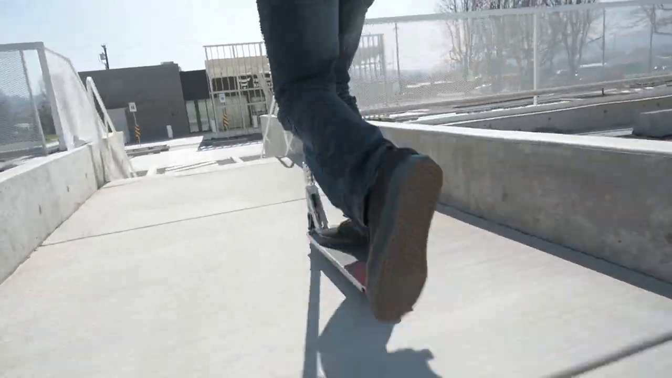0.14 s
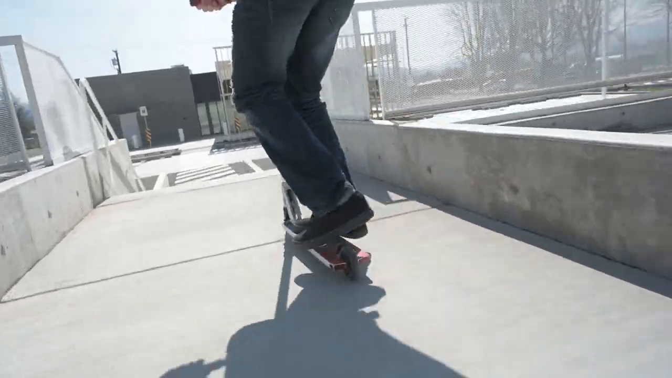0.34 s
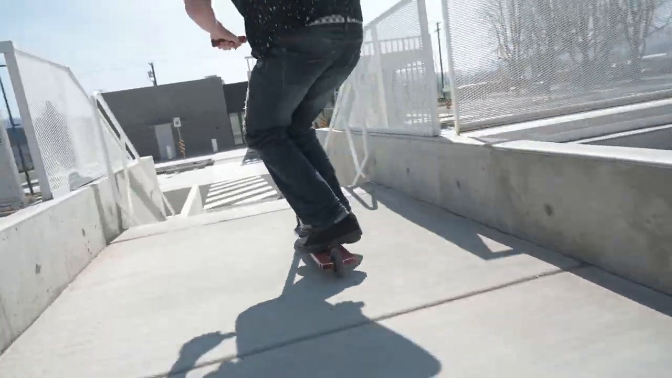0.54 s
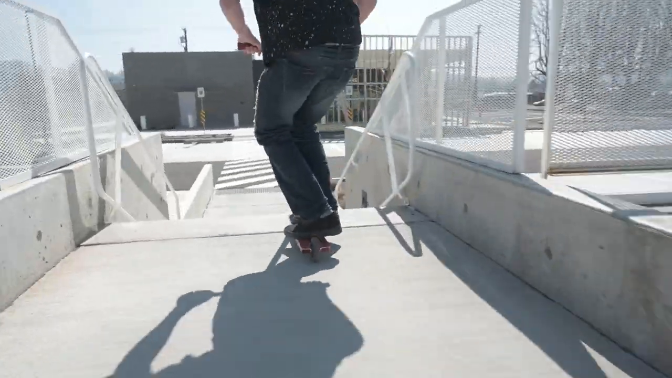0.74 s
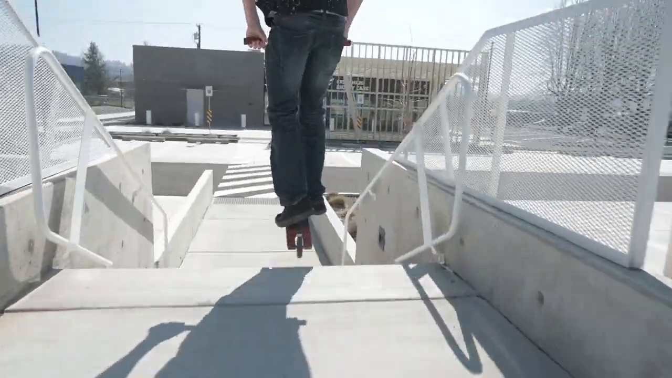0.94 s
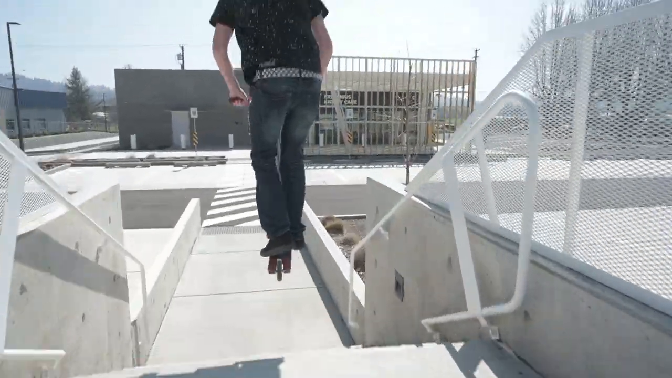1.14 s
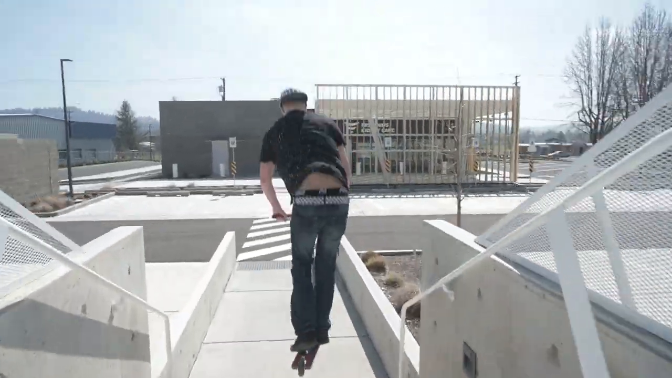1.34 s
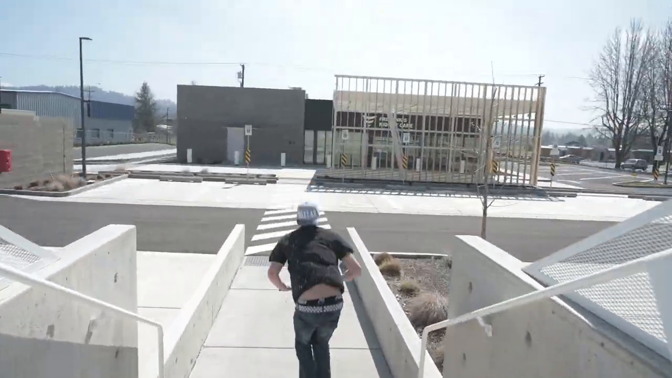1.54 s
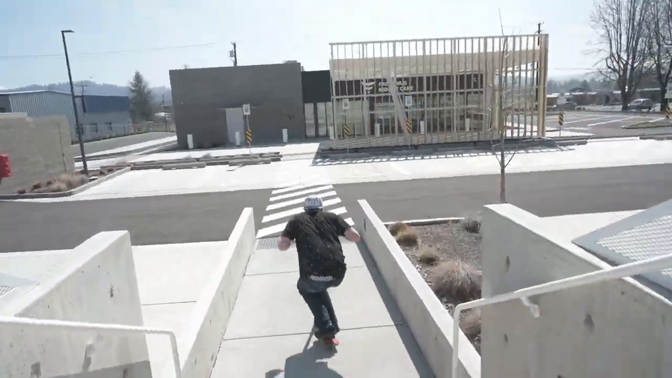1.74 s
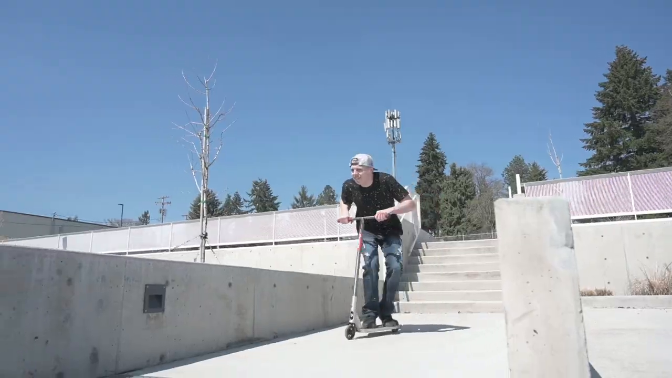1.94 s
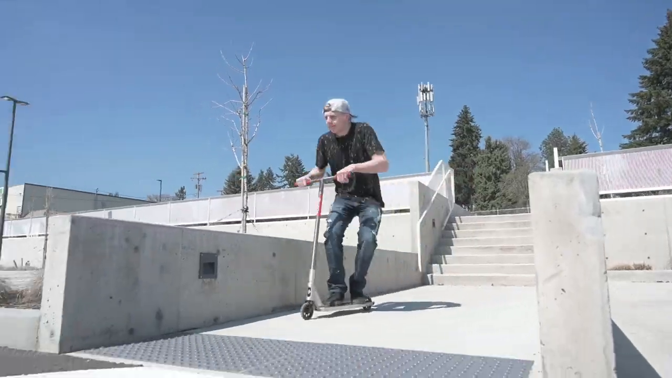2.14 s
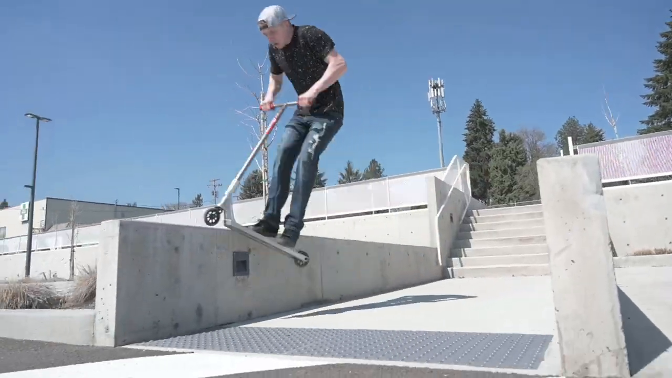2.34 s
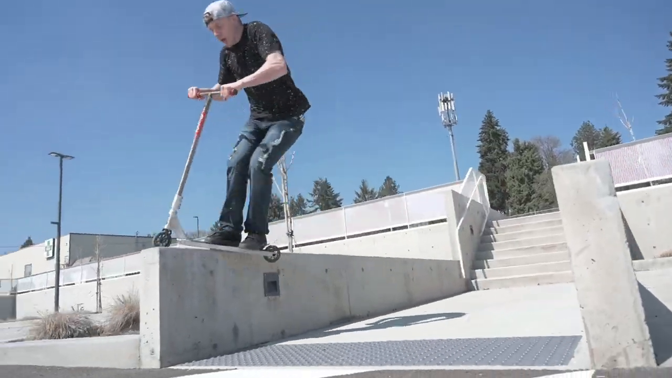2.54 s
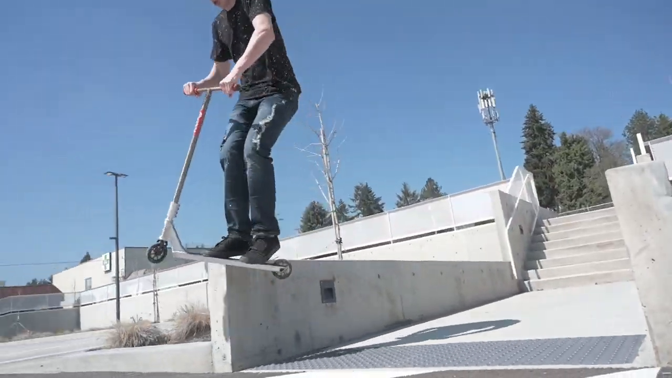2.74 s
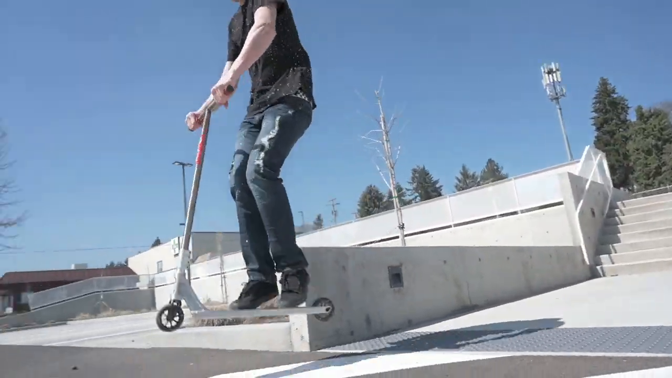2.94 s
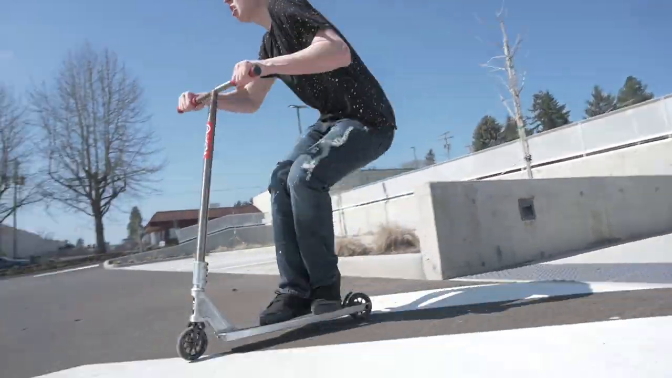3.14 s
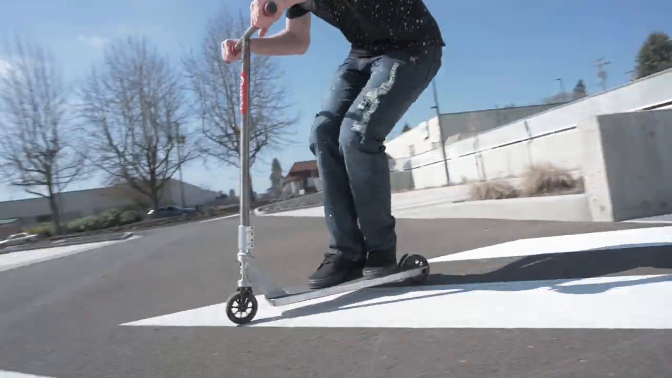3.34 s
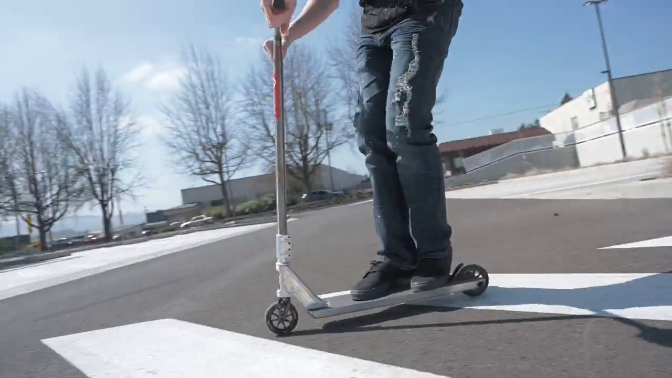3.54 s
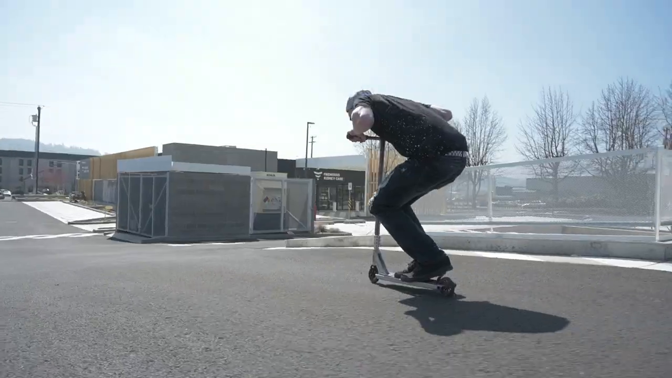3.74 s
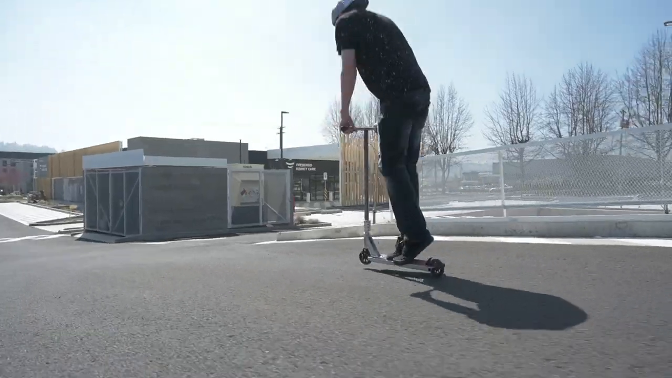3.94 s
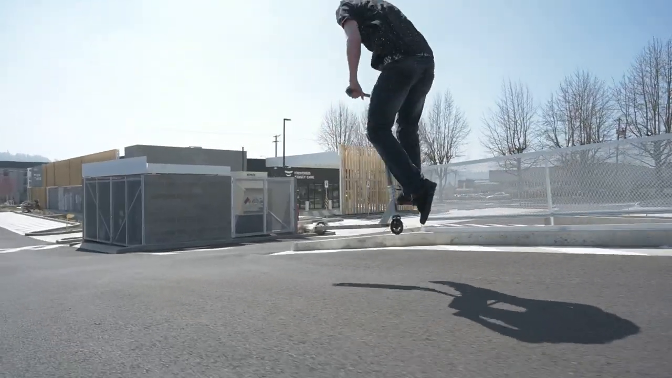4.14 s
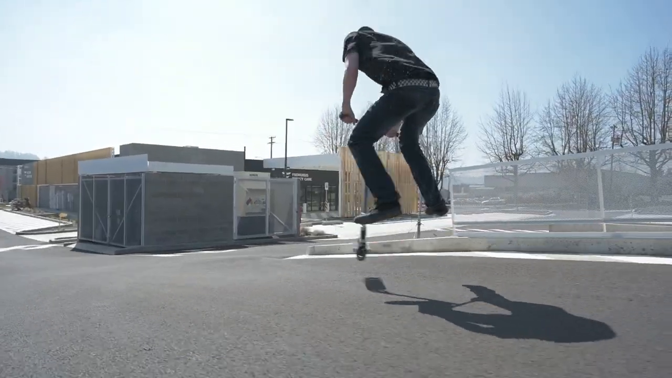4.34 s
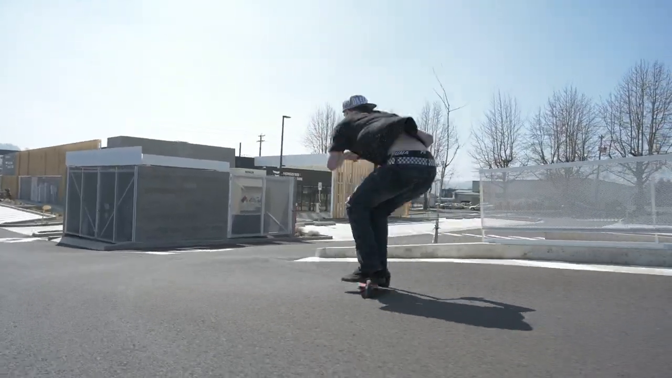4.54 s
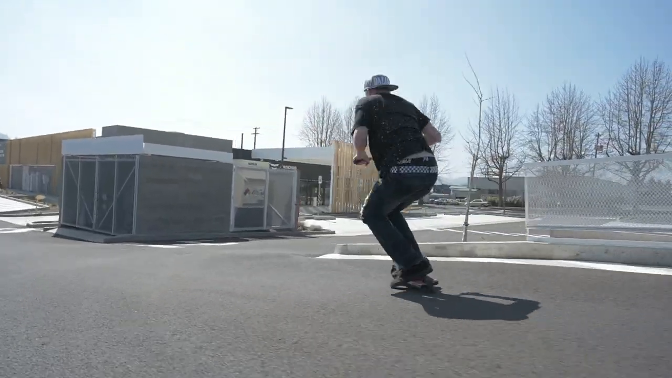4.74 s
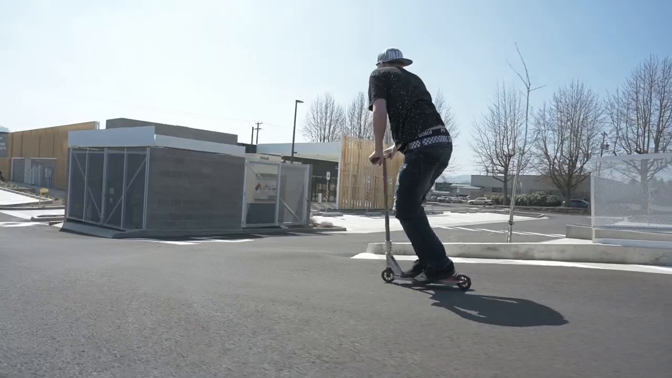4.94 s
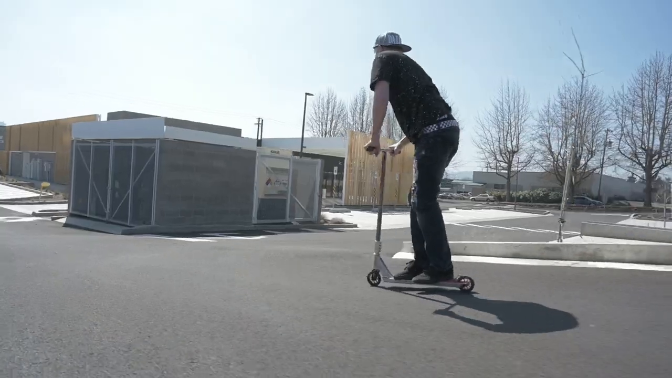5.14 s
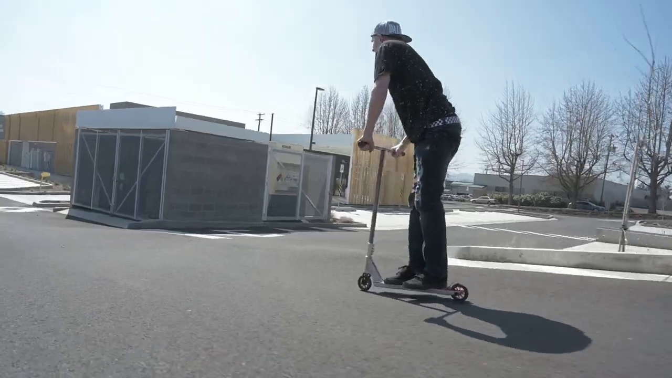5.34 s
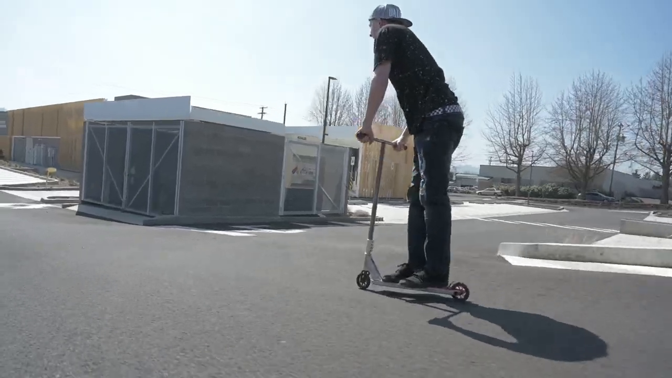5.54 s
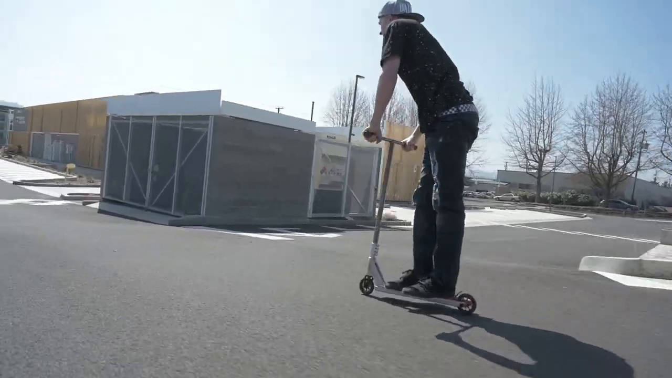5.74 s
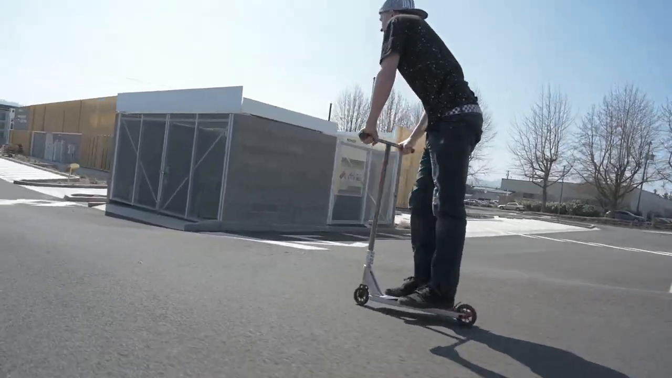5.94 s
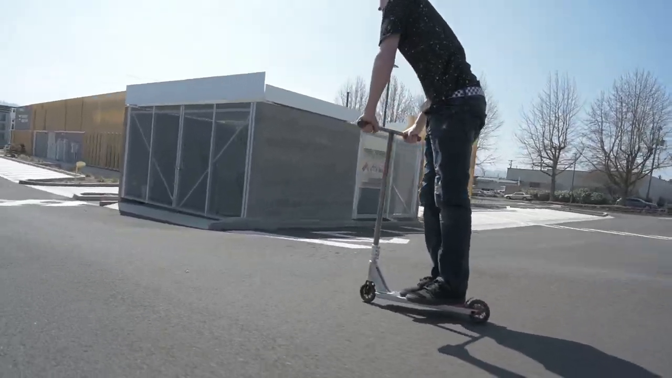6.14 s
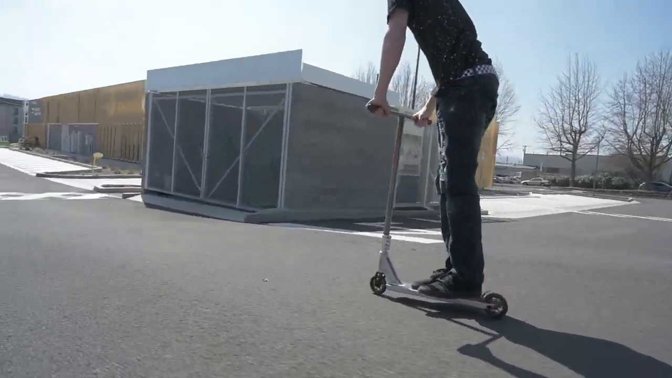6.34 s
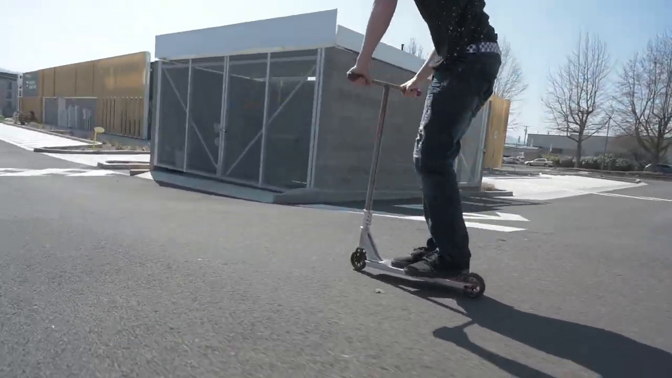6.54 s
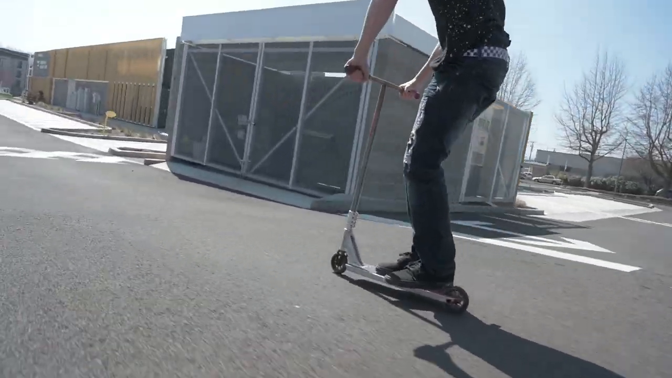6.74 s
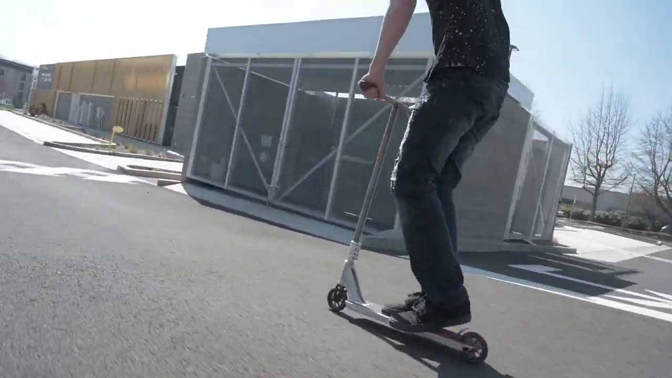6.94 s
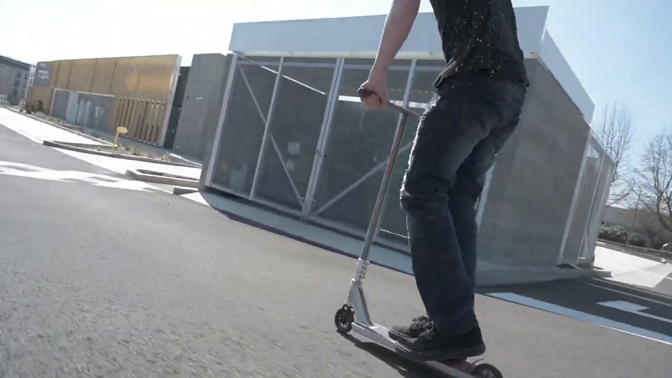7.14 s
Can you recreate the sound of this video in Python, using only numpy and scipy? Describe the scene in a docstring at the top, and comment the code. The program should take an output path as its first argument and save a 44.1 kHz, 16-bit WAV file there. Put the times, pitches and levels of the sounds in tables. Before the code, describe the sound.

A stunt scooter clacks across concrete joints, lands hard after a stair jump, grinds briefly on a ledge, drops to asphalt and rolls on.

```python
"""A stunt scooter clacks over slab joints in a concrete plaza amid low thumps, then whines faintly in a stair jump.
It lands, hops onto a ledge and grinds it, drops to asphalt with a thin ring, lands a tailwhip and rolls on close by.
Blows are noise bursts with decaying tones; the grind is grains ringing the deck; rolling, scuffs and wind are
shaped noise. Loose metal ticks and faint wall echoes surround it."""
import sys
import numpy as np
from scipy import signal
from scipy.fft import rfft, irfft, next_fast_len
from scipy.io import wavfile
from scipy.ndimage import map_coordinates

SR = 44100
rng = np.random.default_rng(int(sys.argv[2]) if len(sys.argv) > 2 else 0)


def log_audio(samples):
    """Write samples as a 16-bit WAV file to the path given in sys.argv[1]."""
    # one column per channel
    frames = np.atleast_2d(samples).T
    # limit to full scale, then quantise
    limited = np.clip(frames, -1, 1)
    pcm = np.round(limited * 32767).astype(np.int16)
    wavfile.write(sys.argv[1], SR, pcm)


N = 317079  # length in samples


def amp(db):
    """Decibels to gain."""
    return 10 ** (np.asarray(db) / 20)


def unit(x):
    """Scale to rms 1."""
    return x / np.sqrt(np.mean(x ** 2) + 1e-20)


def along(points, hz):
    """Read (Hz, value) points on a log frequency axis."""
    f, v = np.transpose(points)
    return np.interp(np.log(hz + 1), np.log(f + 1), v)


def curves(rows):
    """One value per sample for each column after the time."""
    s, *cols = np.transpose(rows)
    return [np.interp(np.arange(N) / SR, s, c) for c in cols]


def wobble(rate):
    """A smooth random curve with `rate` knots a second."""
    knots = rng.standard_normal(int(N * rate / SR) + 4)
    return map_coordinates(knots, [np.arange(N) * rate / SR])


def fade(t, t60):
    """Exponential decay by 60 dB in t60 seconds."""
    return np.exp(-np.log(1000) * t / max(t60, 1e-4))


def coloured(x, points):
    """Filter with the gain of the (Hz, dB) points, without sounding ahead of the input."""
    m = 2 * next_fast_len(len(x) // 2 + 2048)
    log_gain = np.log(amp(along(points, np.fft.rfftfreq(m, 1 / SR))))
    cepstrum = irfft(log_gain)
    # folding the second half onto the first makes the filter minimum phase
    cepstrum[1:m // 2] *= 2
    cepstrum[m // 2 + 1:] = 0
    return irfft(rfft(x, m) * np.exp(rfft(cepstrum)))[:len(x)]


def noise(points):
    """Coloured noise of rms 1."""
    return unit(coloured(rng.standard_normal(N), points))


def ring(modes, t, scatter_db):
    """Decaying tones of a solid body, struck at fresh strengths and signs."""
    sound = 0
    for hz, db, t60 in modes:
        strength = rng.choice([-1, 1]) * amp(db + scatter_db * rng.standard_normal())
        sound = sound + strength * fade(t, t60) * np.sin(2 * np.pi * hz * t)
    return sound


def add(track, s, sound):
    """Mix a sound into the track at time s."""
    part = track[max(round(s * SR), 0):][:len(sound)]
    part += sound[:len(part)]


# How strong the air rumble is. Each row: time in seconds, level in dB before a 1.8 dB boost.
WIND_LEVEL = [(0.0, -51), (0.86, -61.5), (1.4, -57.5), (1.94, -69), (4.64, -72.5), (5.75, -68.5),
              (6.49, -59), (7.19, -62)]
# The tone of the rumble. Each row: frequency in Hz, gain in dB.
WIND_TONE = [(15, -5), (35, -2.5), (90, -3), (150, -3), (300, -31.5), (900, -73)]


def wind():
    """Air buffets the moving microphone: an uneven low rumble."""
    return amp(curves(WIND_LEVEL)[0] + 1.8 + 1.2 * wobble(4)) * noise(WIND_TONE)


# How fast the wall echo dies at each pitch. Each row: frequency in Hz, time to fall 60 dB in seconds.
PLAZA_DECAY = [(150, 0.33), (1000, 0.38), (4000, 0.66), (12000, 0.48)]


def plaza(x):
    """A thin tail from concrete walls: noise that decays at its own speed at each pitch, after a 14 ms delay."""
    hz, t, z = signal.stft(rng.standard_normal(SR // 2), SR, nperseg=256)
    decay = np.exp(-np.log(1000) * t / along(PLAZA_DECAY, hz)[:, None])
    tail = signal.istft(z * decay, SR, nperseg=256)[1]
    delayed = np.pad(x, (round(0.014 * SR), 0))
    return signal.fftconvolve(delayed, tail / np.linalg.norm(tail))[:N]


THUMP_CYCLES = 6.1  # cycles in which a thump falls by 60 dB
# Dull thumps near the microphone. Each row: start in seconds, level in dB before a 6 dB boost, pitch in Hz.
THUMPS = [(0.391, -31, 164), (1.169, -18.5, 92), (1.199, -18.5, 85.5), (1.251, -33.5, 93),
          (1.358, -30.5, 278), (1.38, -34.5, 93), (1.418, -37, 108), (1.774, -26, 124), (1.936, -32, 132)]


def thumps():
    """Soft, heavy bumps: a few low cycles each, with a little dull noise."""
    out, t = np.zeros(N), np.arange(SR // 4) / SR
    for s, db, hz in THUMPS:
        grit = unit(coloured(rng.standard_normal(len(t)), [(400, -1.5), (1500, -20.0), (6000, -37.5)]))
        push = np.sin(2 * np.pi * hz * t) + 0.067 * grit
        onset = 1 - np.exp(-t / 0.0047)
        add(out, s, -amp(db + 6.0) * push * fade(t, THUMP_CYCLES / hz) * onset)
    return out


RATTLE_START_S = 3.7  # from here the rough asphalt shakes the loose parts
RATTLE_PER_S, RATTLE_SCATTER_DB, RATTLE_CLUSTER_DB = 95, 4.2, 2.3
# middle peak level of soft ticks at the cruising level of rolling, and its dB for each dB of rolling
RATTLE_DB, RATTLE_GROWS, CRUISE_DB = -56, 0.79, -55
TICK_DETUNE = .012  # random spread of pitch, as a fraction
# The hardest ticks of loose metal. Each row: start in seconds, peak level in dB.
TICKS = [(0.0064, -34), (0.0397, -34), (0.4657, -32), (0.4833, -37.5), (0.6553, -38), (1.0745, -35),
         (3.2186, -38.5), (3.8716, -37.5), (4.2516, -37.5), (4.8724, -37), (6.309, -35.5), (6.3627, -36.5),
         (6.4846, -32), (6.6044, -35)]
# How the loose metal rings. Each row: frequency in Hz, strength in dB, time to fall 60 dB in seconds.
TINY_RING = [(6080, -5.5, 0.00459), (6610, -9.5, 0.0076), (9200, -8, 0.0104), (9560, -0.5, 0.0073),
             (10100, -9.5, 0.0058)]
# The tone of a tick's contact. Each row: frequency in Hz, gain in dB.
TICK_SNAP = [(2500, -23.5), (6500, -4.5), (9500, -4), (13500, -6), (16000, -18.5)]


def ticks():
    """Loose metal ticks: a few hard ones that snap, and clusters of soft ones that grow with the rolling."""
    out, t = np.zeros(N), np.arange(SR // 40) / SR
    growth_db = RATTLE_GROWS * (curves(ROLL_LEVEL)[0] - CRUISE_DB)
    shake_db = RATTLE_DB + growth_db + RATTLE_CLUSTER_DB * wobble(11.0)
    started = np.arange(N) > RATTLE_START_S * SR
    shaken = np.flatnonzero((rng.random(N) < RATTLE_PER_S / SR) & started)
    size_db = shake_db + RATTLE_SCATTER_DB * rng.standard_normal(N)
    soft = [(i / SR, size_db[i]) for i in shaken]
    for rows, snap_db in ((TICKS, -5), (soft, -11)):
        for s, db in rows:
            snap = amp(snap_db) * unit(coloured(rng.standard_normal(len(t)), TICK_SNAP)) * fade(t, .009)
            detuned_t = t * (1 + TICK_DETUNE * rng.standard_normal())
            tick = (ring(TINY_RING, detuned_t, scatter_db=3.5) + snap) * (1 - np.exp(-t / .0004))
            add(out, s, amp(db) * tick / np.abs(tick).max())
    return out


WHINE_S, WHINE_HALF_S, WHINE_HZ, WHINE_DB = 1.2, .55, 1900, -67  # middle, half length, pitch, peak


def whine():
    """A thin, wavering whine around the stair jump, probably the bearings spinning freely."""
    t = np.arange(N) / SR
    swell = amp(WHINE_DB) * np.exp(-((t - WHINE_S) / WHINE_HALF_S) ** 2)
    return swell * np.sin(2 * np.pi * np.cumsum(WHINE_HZ + 18 * wobble(140)) / SR)


def squeak():
    """A faint, thin, wavering squeak as the scooter rolls away from the last landing."""
    t = np.arange(N) / SR
    swell = amp(-73) * np.exp(-((t - 5.2) / .09) ** 2)
    return swell * np.sin(2 * np.pi * np.cumsum(4390 + 35 * wobble(120)) / SR)


# the tyres skid just after each blow, in step with its strength
SKID_DELAY_S, SKID_HALF_S, SKID_DB = 0.026, 0.022, -23
# Tyres scuffing at take-off and while the rider regains balance.
# Each row: middle in seconds, level in dB, half length in seconds.
SCUFFS = [(0.023, -45.5, 0.074), (1.723, -51.5, 0.12), (2.185, -48, 0.048), (2.264, -52.5, 0.047),
          (3.179, -49, 0.031), (3.27, -49.5, 0.039), (3.997, -50, 0.044), (4.09, -54.5, 0.039),
          (4.651, -50.5, 0.077)]


def scuffs():
    """Tyres rasp briefly as the rider's weight presses on them: fluttering noise in short swells."""
    t = np.arange(N) / SR
    skids = [(s + SKID_DELAY_S, db + SKID_DB, SKID_HALF_S) for s, db, *_ in KNOCKS]
    pressure = sum(amp(db) * np.exp(-((t - s) / half) ** 2) for s, db, half in SCUFFS + skids)
    rasp = noise([(80, -14.0), (250, 7.5), (900, 0.5), (2200, -6.5),
                  (5000, -17.5), (8500, -18.5), (11000, -31), (16000, -32.5)])
    return pressure * amp(3.4 * wobble(90)) * rasp


ROAR_DB = 0.5  # the roar over the rolling level
# How loudly the wheels roll, with speed, ground and distance. Each row: time in seconds, level in dB.
ROLL_LEVEL = [(0.0, -51), (0.26, -52), (0.74, -50.5), (1.32, -56.5), (1.46, -56.5), (1.68, -51.5),
              (1.86, -56.5), (2.58, -57.5), (2.68, -50), (2.88, -57.5), (3.42, -55), (4.44, -58),
              (5.02, -52), (6.61, -46.5), (6.73, -44.5), (7.19, -43.5)]
# The wheels' hiss. Each row: time in seconds, level in dB before a 2.5 dB cut.
HISS_LEVEL = [(0.0, -64.5), (0.56, -61), (2.08, -70), (2.58, -62.5), (2.68, -66), (2.88, -65.5),
              (3.85, -69), (6.25, -65), (6.71, -58), (7.19, -56)]
# The tone of the roar. Each row: frequency in Hz, gain in dB.
ROAR_TONE = [(41, -32.5), (70, -6.5), (216, 0), (337, 2), (410, -1), (465, 3), (556, -3.5), (619, 1),
             (900, -0.5), (1060, -5), (1160, -3.5), (1290, -9), (2490, -15.5), (4410, -45), (5000, -35),
             (6500, -68), (11000, -120)]
# The tone of the hiss. Each row: frequency in Hz, gain in dB.
HISS_TONE = [(1200, -27.5), (2200, 7), (3300, 3), (4500, -3.5), (6700, -5), (8300, -6), (9600, -9.5),
             (11000, -12.5), (14000, -13), (16000, -18.5)]


def rolling():
    """Hard wheels on gritty ground: a roar and a hiss that flutter together with the surface."""
    surface = wobble(35)
    roar = amp(curves(ROLL_LEVEL)[0] + ROAR_DB + 1.2 * surface) * noise(ROAR_TONE)
    hiss = amp(curves(HISS_LEVEL)[0] - 2.5 + 0.98 * surface) * noise(HISS_TONE)
    return roar + hiss


CRACK_GROWS = 1.25  # dB of a blow's topmost crack for each dB of hardness


def registers(db, weight_db, hardness_db, crack_db):
    """Thud, knock, clack and crack of a blow: weight feeds the lowest, hardness the upper two."""
    return [db + weight_db, db, db + hardness_db, db + CRACK_GROWS * hardness_db + crack_db]


def blow(modes, spectrum, levels_db, t60, ring_db, chatter_db, chatter_t60, rise):
    """A burst of contact plus ringing and chatter of the metal, levelled in four registers."""
    t = np.arange(SR // 3) / SR
    contact = fade(t, t60) + amp(chatter_db) * fade(t, chatter_t60)
    burst = unit(coloured(rng.standard_normal(len(t)) * contact, spectrum))
    sound = burst + amp(ring_db) * unit(ring(modes, t, scatter_db=6.5))
    sound = sound * (1 - np.exp(-t / rise))
    edges = [80, 400, 1700, 5000, 16000]  # Hz
    attack = round(.012 * SR)  # each level holds for this first part
    total = np.zeros(len(t))
    for k, db in enumerate(levels_db):
        sos = signal.butter(2, edges[k:k + 2], "band", fs=SR, output="sos")
        band = signal.sosfilt(sos, sound)
        # neighbouring registers meet in opposite phase, so their signs alternate
        total += (-1) ** k * amp(db) * band / np.std(band[:attack])
    return total


CONTACT_T60_S, HALVING_DB = 0.033, 36  # the burst of a blow halves in length with this much more hardness
CRACK_DB = -4  # a wheel's crack under its clack, at zero hardness
CRACK_MAX_DB = -26  # the tyre gives under the heaviest blows; this limit comes before the 4 dB cut
# Wheels striking the ground. Each row: start in seconds, strength in dB before a 4 dB cut,
# weight behind the blow in dB over the strength, hardness in dB over the strength.
KNOCKS = [(0.1135, -27, -1, -16.5), (0.532, -36, 12.5, -14), (0.651, -48, 11, -8), (0.784, -51.5, 15, -6),
          (0.914, -45.5, 5, -7.5), (1.057, -56, 15.5, -8), (1.512, -47, -24, -15),
          (1.542, -40.5, -28, -12.5), (1.577, -16.5, 5, 3.5), (1.5875, -19, -21, -5),
          (1.75, -38, -3.5, -13.5), (2.156, -45.5, 10.5, -7), (2.261, -31, -36, -15.5),
          (3.1091, -26.5, 7, 7), (3.147, -38, 6.5, -2.5), (4.016, -59, -15, 10), (4.098, -59.5, 4, 7.5),
          (4.542, -32.5, -12, 4), (4.553, -19, -17, -13), (4.5822, -20, -17, -20),
          (6.065, -40.5, -14, -11.5)]
# How wheels, fork and bar ring. Each row: frequency in Hz, strength in dB, time to fall 60 dB in seconds.
FRAME_RING = [(189, -3.5, 0.14), (235, -1.5, 0.085), (387, -13.5, 0.091), (530, 0, 0.098),
              (601, -8.5, 0.072), (822.6, 6, 0.078), (1136, -7.5, 0.077), (1370, -7, .09),
              (1440, -13.5, .06), (2440, -8.5, 0.015), (3060, -14.5, 0.047), (3540, -8.5, 0.021),
              (7210, -22, 0.019), (8570, -29, 0.046)]
# The tone of a wheel's contact. Each row: frequency in Hz, gain in dB.
BLOW_TONE = [(35, -32.5), (60, -19), (165, 1), (260, 2.5), (400, -10), (838, -2.5), (964, -9.5),
             (1300, -3.5), (1690, -17), (2340, -16), (3600, -20.5), (4700, -27), (8640, -26.5),
             (10300, -39.5), (14000, -38.5), (15800, -47.5)]


def knocks():
    """Joints and landings drive the wheels into the fork and bar; harder contacts are brighter and shorter."""
    out = np.zeros(N)
    for s, db, weight_db, hardness_db in KNOCKS:
        thud, knock, clack, crack = registers(db, weight_db, hardness_db, CRACK_DB)
        levels_db = [thud, knock, clack, min(crack, CRACK_MAX_DB)]
        t60 = CONTACT_T60_S * 2 ** (-hardness_db / HALVING_DB)
        add(out, s, blow(FRAME_RING, BLOW_TONE, levels_db, t60,
                         ring_db=-3.5, chatter_db=-31.5, chatter_t60=.1, rise=0.00092))
    return amp(-4.0) * out


DECK_WEIGHT_DB, DECK_CRACK_DB = -8.5, -2  # thud and crack of a square slap; a glancing one loses both
# The deck striking the ledge. Each row: start in seconds, strength in dB before a 1.5 dB cut,
# hardness in dB over the strength, time for the contact to fall 60 dB in seconds.
SLAPS = [(2.534, -18.5, 0, 0.029), (2.5617, -30.5, -6.5, 0.11), (2.734, -29.5, -13, 0.054),
         (2.765, -23, -17, 0.092)]
# How the deck rings on concrete. Each row: frequency in Hz, strength in dB, time to fall 60 dB in seconds.
DECK_RING = [(512, -6.5, 0.038), (620, -0.5, 0.058), (940, 0.5, 0.065), (1200, -3, 0.034), (1427, 8, 0.045),
             (2270, -9, .04), (2340, -4.5, 0.036), (2900, -6.5, 0.033), (3320, -7, .035),
             (4200, -12, 0.018), (5550, -12, .02), (5430, -9.5, 0.042), (8600, -10.5, 0.016),
             (13300, -20, .008)]
# The tone of the deck's contact. Each row: frequency in Hz, gain in dB.
SLAP_TONE = [(47, -45.5), (100, -17), (450, -5), (933, -5), (1450, -5.5), (2950, -5.5), (5120, -17.5),
             (6250, -15), (8600, -16), (9800, -30), (13800, -22.5), (16000, -29)]


def slaps():
    """The deck hits the ledge, bounces, and clips its edge on leaving: bright bursts that ring the deck."""
    out = np.zeros(N)
    for s, db, hardness_db, t60 in SLAPS:
        levels_db = registers(db, DECK_WEIGHT_DB + .7 * hardness_db, hardness_db, DECK_CRACK_DB)
        add(out, s, blow(DECK_RING, SLAP_TONE, levels_db, t60,
                         ring_db=-2.0, chatter_db=-35.0, chatter_t60=0.058, rise=0.00017))
    return amp(-1.5) * out


# A thin ring in the metal after the grind and the drop. Each row: start in seconds, level in dB.
AFTERRING = [(2.79, -58), (3.112, -52)]


def afterring():
    """A close pair of high steel tones outlasts the rest."""
    out, t = np.zeros(N), np.arange(SR // 2) / SR
    for s, db in AFTERRING:
        add(out, s, amp(db) * ring([(4950, 0, .36), (5030, -6, .25)], t, scatter_db=1))
    return out


GRIND_START_S, GRIND_FULL_S, GRIND_END_S = 2.545, 2.63, 2.785  # the deck touches, bears fully, leaves
GRIND_DB = -41.5  # full sliding level, before judder and the scrape's 3 dB boost
GRIND_RISE_DB_PER_S, GRIND_FALL_DB_PER_S = 130, 422
JUDDER_HZ, JUDDER_DB = 13, 3.5  # the sliding deck sticks and slips
CONTACT_WANDER_DB, CONTACT_WANDER_PER_S = 5, 40
# The tone of the scrape. Each row: frequency in Hz, gain in dB.
SCRAPE_TONE = [(100, -48), (250, -17), (500, -6.5), (750, -9), (1050, -22), (1500, -5), (2400, -8),
               (4000, -17.5), (5600, -9.5), (7000, -26), (9000, -22), (10500, -31.5), (13500, -24.5),
               (16000, -50)]


def grind():
    """Concrete grains catch on the juddering deck and ring it, the load wandering between three contact points."""
    t = np.arange(N) / SR
    rise_db = GRIND_RISE_DB_PER_S * np.maximum(GRIND_FULL_S - t, 0)
    fall_db = GRIND_FALL_DB_PER_S * np.maximum(t - GRIND_END_S, 0)
    level_db = GRIND_DB - rise_db - fall_db
    judder_db = JUDDER_DB * np.cos(2 * np.pi * JUDDER_HZ * (t - GRIND_END_S))
    rough_db = 1.2 * wobble(190) + 1.3 * wobble(600)
    sliding = amp(level_db + judder_db + rough_db) * (t > GRIND_START_S)
    grains = unit(rng.standard_normal(N) * (rng.random(N) < 4000 / SR))  # about 4000 a second
    bite = amp(np.interp(t, [2.68, 2.77], [-4, 2]))  # the deck rings harder towards the end
    loads = np.array([amp(CONTACT_WANDER_DB * wobble(CONTACT_WANDER_PER_S)) for _ in range(3)])
    body = np.zeros(N)
    for load in loads / np.linalg.norm(loads, axis=0):
        # each contact point has its own slightly shifted ring
        deck_t = t[:SR // 4] * (1 + .04 * rng.standard_normal())
        deck = ring(DECK_RING, deck_t, scatter_db=4)
        body += signal.fftconvolve(load * bite * sliding * grains, deck / np.linalg.norm(deck))[:N]
    scrape = amp(3.0) * sliding * unit(coloured(grains, SCRAPE_TONE))
    return scrape + body


def scene():
    """The scooter, its echo, and the small sounds near the microphone."""
    scooter = knocks() + slaps() + grind() + afterring() + scuffs() + squeak() + whine()
    echo = amp(-27) * plaza(scooter)
    return (scooter + echo + rolling() + wind() + thumps() + ticks())[None]


TOP_HZ = 15900  # nothing is kept from here up


def record(dry):
    """Clip at full scale, then remove everything above the band limit."""
    m = next_fast_len(N + SR // 2)
    kept = np.fft.rfftfreq(m, 1 / SR) < TOP_HZ
    return irfft(rfft(np.clip(dry, -1, 1), m) * kept, m)[..., :N]


dry = scene()
out = record(dry)
log_audio(out)
```